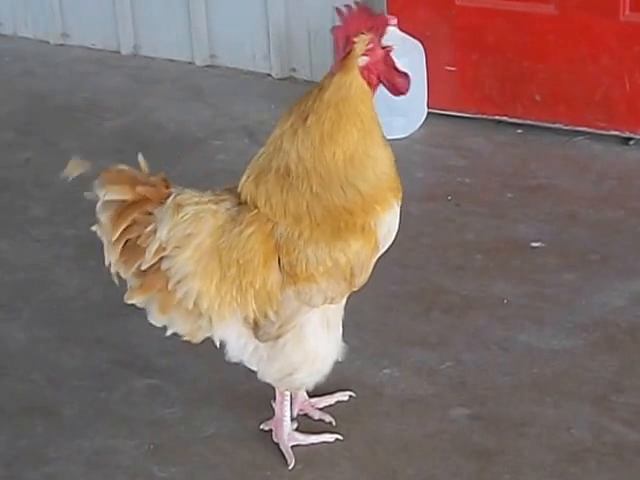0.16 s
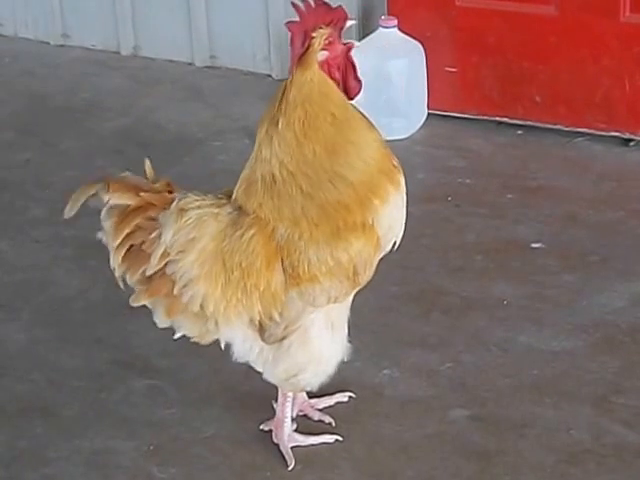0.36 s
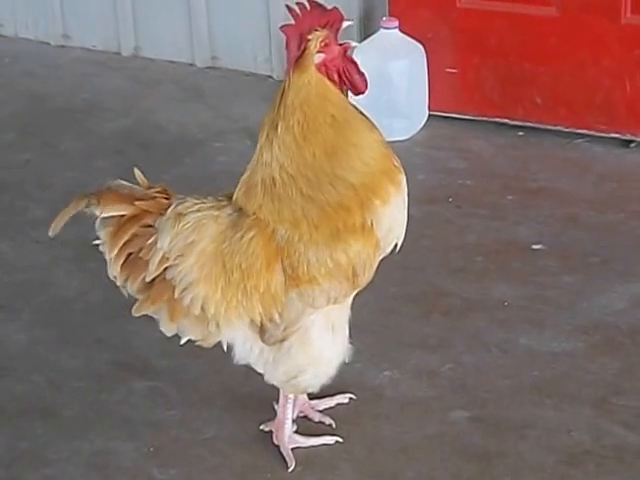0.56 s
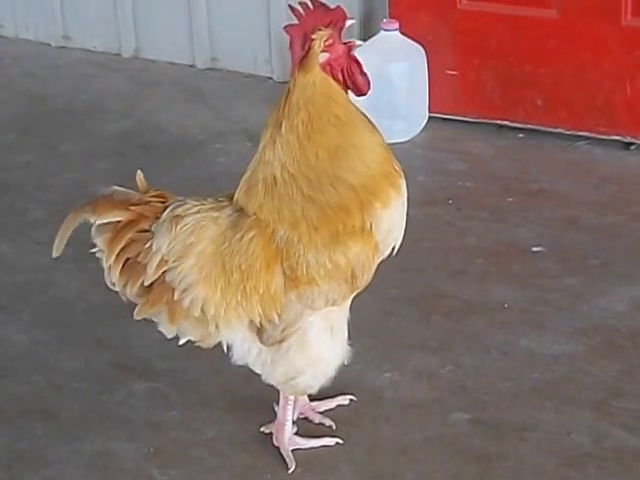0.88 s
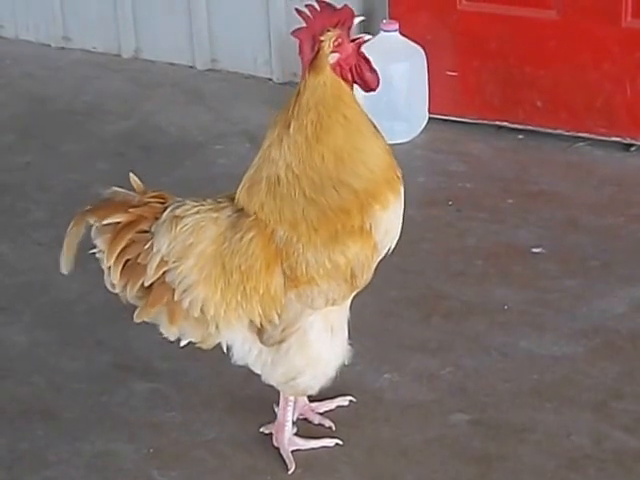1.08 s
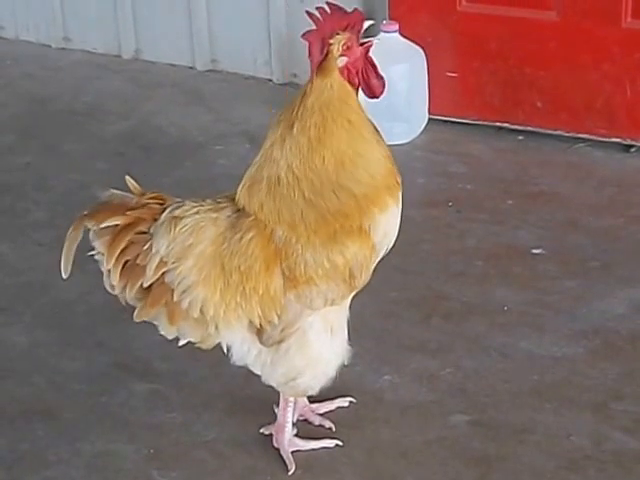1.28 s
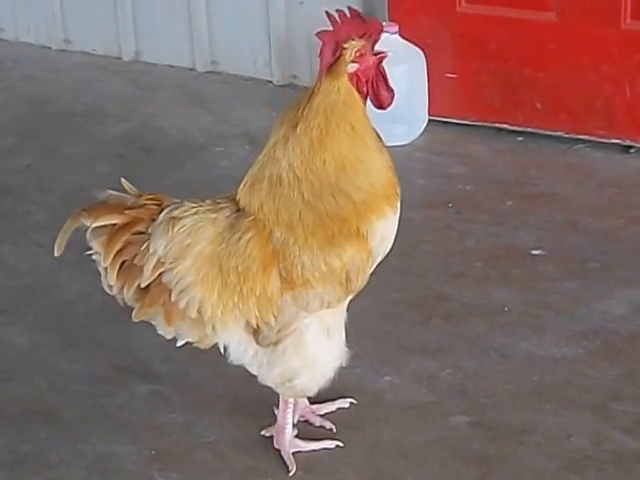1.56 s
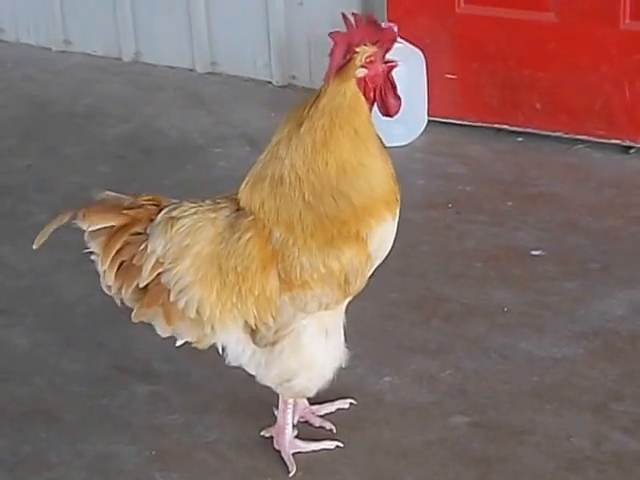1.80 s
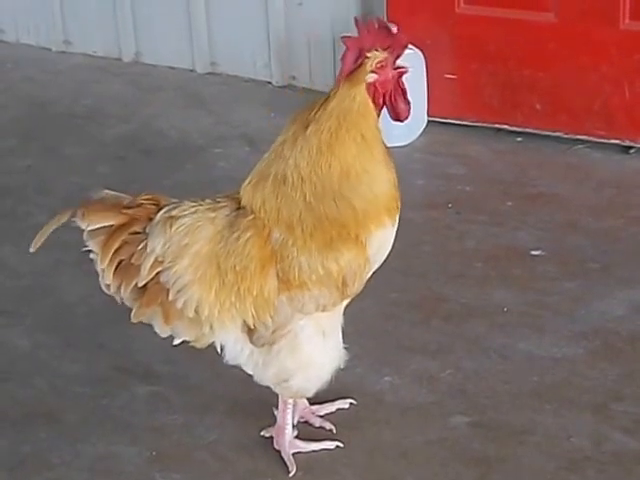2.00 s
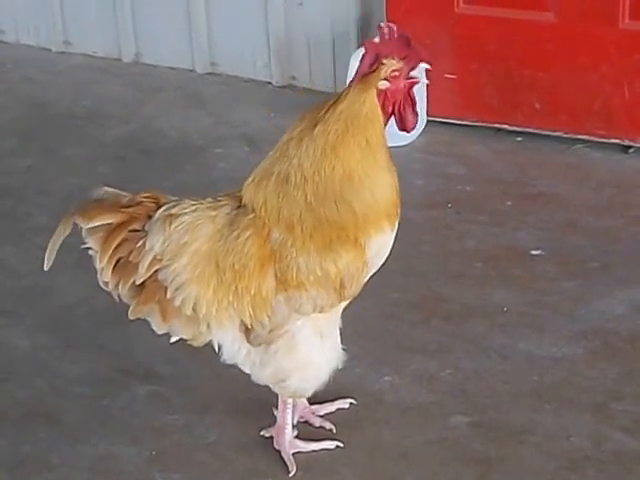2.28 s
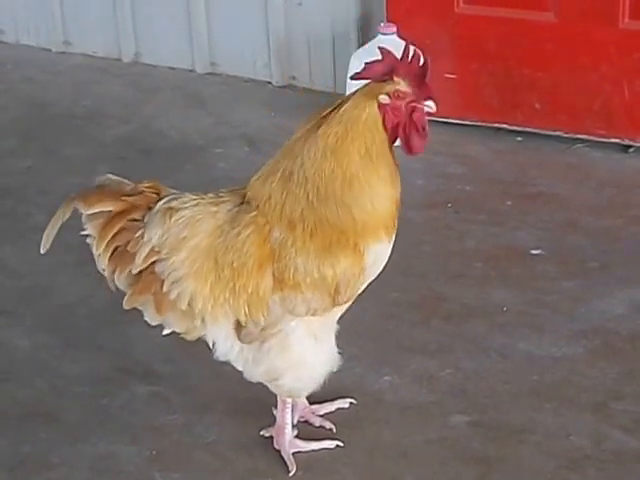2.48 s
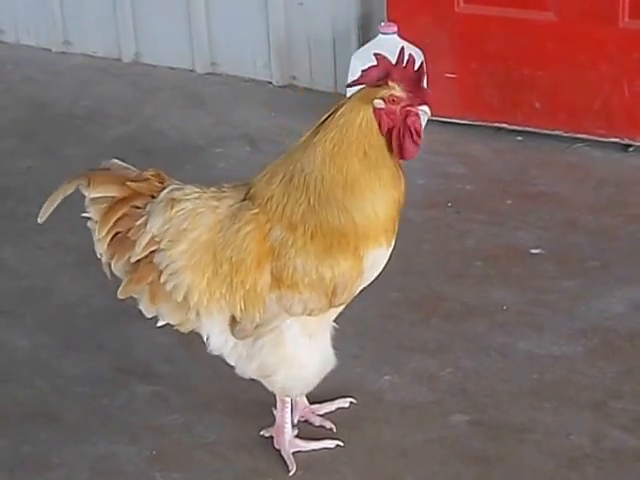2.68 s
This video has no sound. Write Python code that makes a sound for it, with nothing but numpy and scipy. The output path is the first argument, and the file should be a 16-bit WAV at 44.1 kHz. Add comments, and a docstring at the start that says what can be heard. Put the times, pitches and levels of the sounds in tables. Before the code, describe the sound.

A single close rooster crow: a rough bark and short nasal note, two rasping syllables, then a long note cracking into screeches, clearing and sagging to a gulp, with shed echo and faint microphone rumble.

```python
"""Concrete-floored shed: a rooster crows once. A bark and a short note, two rasping syllables,
then a long note that breaks twice into a screech, clears, sags and ends in a gulp.
Rough voice: uneven syrinx slaps through resonances, plus wavering partials; clear voice: sine partials.
The shed adds a decaying noise echo; filtered noise gives air and a rumble on the microphone, with one low bump.
The camera turns its gain down under the crow, lifts the treble and limits peaks."""
import sys
import numpy as np
from scipy import signal
from scipy.fft import rfft, irfft, next_fast_len
from scipy.io import wavfile
from scipy.ndimage import uniform_filter1d, minimum_filter1d, map_coordinates

SR = 44100
rng = np.random.default_rng(int(sys.argv[2]) if len(sys.argv) > 2 else 0)


def store_pcm(level_fs):
    """Save levels as 16-bit WAV."""
    pcm = np.round(np.clip(level_fs, -1, 1) * 32767).astype(np.int16)
    wavfile.write(sys.argv[1], SR, np.atleast_2d(pcm).T)


N = 125685

# Loudness of the third syllable's rasp and pitched core: (t/s, relative level/dB)
THIRD = [(.678, -17.5), (.702, -14.5), (.724, -15.5), (.74, -8.5), (.765, -21.5), (.788, -16.5),
         (.808, -24.5), (.844, -9.5), (.86, -18.5), (.888, -13), (.942, -21.5), (.985, -16.5),
         (1.062, -16.5), (1.086, -17.5), (1.14, -25.5), (1.2, -42.5), (1.27, -41)]
# Loudness of the screech's rasp and pitched core: (t/s, relative level/dB)
SCREECH = [(1.282, -24), (1.305, -12), (1.33, -10.5), (1.345, -17.5), (1.41, -9.5), (1.425, -15),
           (1.495, -13.5), (1.57, -14), (1.67, -12), (1.703, -19), (1.718, -24), (1.79, -34.5), (1.822, -8),
           (1.838, -12.5), (1.858, -9.5), (1.874, -27.5), (1.985, -37.5)]
TOP_HZ = 8080  # upper band limit
FLUTTER = .0008  # pitch tremble of the clear voice, fraction of pitch


def amp(db):
    """Decibels to gain."""
    return 10 ** (np.asarray(db) / 20)


def unit(x):
    """Scale to rms 1."""
    return x / np.sqrt(np.mean(x ** 2) + 1e-20)


def along(points, hz):
    """(f/Hz, value) points interpolated on a log frequency axis."""
    f_hz, values = np.transpose(points)
    return np.interp(np.log(hz + 1), np.log(f_hz + 1), values)


def curve(rows, axis=1):
    """One column of a timed table, per sample."""
    rows = np.asarray(rows)
    return np.interp(np.arange(N) / SR, rows[:, 0], rows[:, axis])


def gate(rows):
    """Open from the first to the last row of a timed table, with linear edges."""
    edge_s = 0.0051
    t = np.arange(N) / SR
    inside_s = np.minimum(t - rows[0][0], rows[-1][0] - t)
    return np.clip(inside_s / edge_s + .5, 0, 1)


def wobble(knots_per_s):
    """Smooth random curve through standard normal knots."""
    knots = rng.standard_normal(4096)
    return map_coordinates(knots, [np.arange(N) * knots_per_s / SR], mode="wrap")


def filtered(x, response):
    """x times a response of frequency, zero-padded against wrap-around."""
    m = next_fast_len(N + SR // 2)
    spectrum = rfft(x, m) * response(np.fft.rfftfreq(m, 1 / SR))
    return irfft(spectrum, m)[..., :N]


def coloured(x, colour):
    """x through causal, ringing resonances of a (f/Hz, level/dB) colour, at rms 1."""
    def response(hz):
        # folded cepstrum: minimum phase
        cepstrum = irfft(np.log(amp(along(colour, hz))))
        half = len(cepstrum) // 2
        cepstrum[1:half] *= 2
        cepstrum[half + 1:] = 0
        return np.exp(rfft(cepstrum)) * (hz < TOP_HZ)
    return unit(filtered(x, response))


def phase_of(pitch_hz, flutter):
    """Phase of the syrinx, whose pitch trembles slightly."""
    trembling_hz = pitch_hz * (1 + flutter * wobble(knots_per_s=110))
    return 2 * np.pi * np.cumsum(trembling_hz) / SR


def harmonics(phase, lines):
    """Sum of (multiple, level/dB) sine partials at rms 1."""
    return unit(sum(amp(db) * np.sin(k * phase) for k, db in lines))


def background():
    """Steady air noise, a lumpy rumble on the microphone and one soft low bump: a sine under a Gaussian."""
    # Air noise spectrum: (f/Hz, relative level/dB)
    air_colour = [(120, -25.5), (400, -10), (800, -10), (1700, -14), (3800, -16.5), (7500, -33)]
    # Rumble spectrum: (f/Hz, relative level/dB)
    rumble_colour = [(20, -1), (75, 5), (120, 2.5), (200, -3), (700, -11), (1300, -41.5)]
    # Rumble loudness: (t/s, level/dB)
    rumble_level = [(0, -33), (.2, -32), (.35, -34), (.6, -24), (.8, -42.5), (1.02, -29), (1.3, -39.5),
                    (2.7, -29.5), (2.8, -17.5), (2.85, -33)]
    air_db = -34
    bump_db, bump_s, bump_hz, bump_width_s = -10, 2.808, 114.6, 0.008
    air = amp(air_db) * coloured(rng.standard_normal(N), air_colour)
    rumble_gain = amp(curve(rumble_level) + 1.3 * wobble(knots_per_s=25))
    rumble = rumble_gain * coloured(rng.standard_normal(N), rumble_colour)
    t = np.arange(N) / SR - bump_s
    bump = -amp(bump_db) * np.exp(-(t / bump_width_s) ** 2) * np.sin(2 * np.pi * bump_hz * t)
    return air + rumble + bump


def rough(loudness, colour, pulse_hz, jitter, gain_db):
    """Syrinx slaps at a wandering nominal rate and uneven times; body and treble vary apart; throat colours."""
    wander, wander_per_s = .035, 45  # log rate, knots/s
    scatter_db, surge_db, surge_per_s = 2.5, 1.8, 240  # per slap; slower swell, knots/s
    split_hz = 3300  # body below, treble above
    chance = rng.standard_normal((4096, 3))  # interval, body level, treble level
    cycles = np.cumsum(pulse_hz * np.exp(wander * wobble(wander_per_s))) / SR
    slap_cycles = np.cumsum(np.exp(jitter * chance[:, 0]))
    at = np.interp(slap_cycles, cycles, np.arange(N))
    keep = at < N - 1
    at = at[keep].astype(int)

    def slap_train(column):
        slaps = np.bincount(at, amp(scatter_db * chance[keep, column]), N)
        return (slaps - slaps.mean()) * amp(surge_db * wobble(surge_per_s))

    body, treble = slap_train(1), slap_train(2)
    pulses = body + filtered(treble - body, lambda hz: hz > split_hz)
    voice = coloured(pulses, [(60, -70)] + list(colour))
    return voice * amp(curve(loudness) + gain_db) * gate(loudness)


def rasps():
    """The rough stretches: trains of slaps, each through its own throat resonances."""
    # Loudness of bark, second syllable and gulp: (t/s, relative level/dB)
    bark = [(.198, -10), (.205, 3.5), (.218, -8), (.234, -21.5), (.25, -23.5), (.3, -31), (.345, -46),
            (.365, -18), (.385, -25.5)]
    second = [(.448, -12), (.457, -10), (.476, 4.5), (.492, -25), (.515, -20), (.538, -6.5), (.56, -25.5),
              (.595, -27.5), (.63, -15), (.652, -11), (.675, -19)]
    gulp = [(2.455, -23), (2.466, -15), (2.478, -19), (2.495, -31)]
    # Throat resonances of each rough stretch: (f/Hz, relative level/dB)
    bark_colour = [(300, -26.5), (470, -20), (570, -3), (670, 0), (780, -10.5), (1000, -7), (1350, 0),
                   (1680, -0.5), (2100, -6), (2600, -24.5), (2980, -3.5), (3550, -40), (4700, -16),
                   (5550, -15), (6200, -24.5), (7300, -33)]
    second_colour = [(300, -38.5), (520, -30.5), (620, -5), (700, 8), (880, -14), (1170, -11), (1650, -4),
                     (1950, -8.5), (2180, -1), (2520, -19.5), (2860, -5), (3450, -38), (3900, -10.5),
                     (4200, -17), (4850, -10), (5500, -22), (7300, -34)]
    third_colour = [(300, -47.5), (490, -45), (610, -6), (700, 7), (900, -16), (1150, -7), (1270, -10),
                    (1480, -3.5), (1650, 1.5), (1920, -2.5), (2170, 0), (2480, -17.5), (2880, -8.5),
                    (3300, -22), (3950, -17), (4300, -15), (4880, -6.5), (5550, -21.5), (7300, -27)]
    screech_colour = [(300, -39), (490, -19), (610, -6.5), (700, -13.5), (860, -12), (1020, -26),
                      (1330, -4), (1450, -5.5), (1690, 3.5), (1900, -6), (2460, -26.5), (2680, -22.5),
                      (3100, -33), (3650, -32), (4400, -28), (4900, -11.5), (5400, -16), (7100, -39.5)]
    gulp_colour = [(300, -25), (480, -17.5), (580, 5), (680, -12), (850, -19.5), (1370, -8), (1550, -7),
                   (2300, -29), (2800, -21.5), (3400, -41), (5400, -32.5), (7300, -48.5)]
    return (rough(bark, bark_colour, pulse_hz=299.6, jitter=.26, gain_db=-5.0)
            + rough(second, second_colour, pulse_hz=601.0, jitter=.18, gain_db=-4.5)
            + rough(THIRD, third_colour, pulse_hz=552, jitter=.17, gain_db=-3.0)
            + rough(SCREECH, screech_colour, pulse_hz=828, jitter=.25, gain_db=-4.5)
            + rough(gulp, gulp_colour, pulse_hz=580, jitter=.12, gain_db=0))


def first_note():
    """A sine scoops up in the bark, then a short, low, nasal note; uneven cycles blur its upper harmonics."""
    # Upward scoop: (t/s, pitch/Hz, relative level/dB)
    scoop_track = [(.198, 555, -16), (.215, 595, -15), (.238, 700, -21)]
    # Short note: (t/s, pitch/Hz, relative level/dB)
    note_track = [(.25, 486, -13.5), (.27, 489, -21.5), (.282, 492.8, -9), (.308, 491.2, -14.5),
                  (.326, 496.4, -25.5), (.347, 506, -14), (.365, 499, -22)]
    # Its harmonics: (multiple of pitch, relative level/dB)
    note_lines = [(1, -18), (2, -15), (3, -3.5), (4, -1), (6, -17.5), (8, -15), (9, -17), (10, -8.5),
                  (11, -17.5), (12, -22.5)]
    scoop = np.sin(phase_of(curve(scoop_track), FLUTTER))
    scoop = scoop * amp(curve(scoop_track, axis=2)) * gate(scoop_track)
    phase = phase_of(curve(note_track), flutter=.005) + .06 * wobble(knots_per_s=300)
    note = harmonics(phase, note_lines) * amp(curve(note_track, axis=2)) * gate(note_track)
    return scoop + note


def split_voice(loudness, lines, flutter, gain_db):
    """The syrinx's two sides pull against each other: partials waver together and swell in turn."""
    swap_db, swap_per_s = 5, 32  # swell of each partial, knots/s
    phase = phase_of(np.ones(N), flutter)  # of 1 Hz
    voice = sum(amp(db + swap_db * wobble(swap_per_s)) * np.sin(hz * phase) for hz, db in lines)
    return unit(voice) * amp(curve(loudness) + gain_db) * gate(loudness)


def hoarse_tones():
    """Pitched cores of the rough stretches: wavering partials of the split syrinx."""
    # The voice catches a pitch in the second syllable: (t/s, level/dB before the crow's gain)
    catch = [(.47, -31), (.51, -19.5), (.54, -14), (.56, -36)]
    # Partials of catch, third syllable and screech: (f/Hz, relative level/dB)
    catch_lines = [(785, -1.5), (1190, -1.5), (1580, -2), (2380, 4.5), (3150, -7), (3885, 7.5)]
    third_lines = [(705, -5), (1055, -8), (1175, -3.5), (1480, -3.5), (1650, 2.5), (2160, 0), (2700, -13.5),
                   (3875, -13.5), (4850, -9.5)]
    screech_lines = [(605, -6.5), (860, -9), (1655, 2.5), (1745, -1), (4970, -16)]
    return (split_voice(catch, catch_lines, flutter=.006, gain_db=0)
            + split_voice(THIRD, third_lines, flutter=.013, gain_db=-3.5)
            + split_voice(SCREECH, screech_lines, flutter=.013, gain_db=-7))


def long_note(low_db=1, octave_db=1):
    """Clear voice: two strong partials, overtones sliding through throat resonances, period doubling at onset."""
    # Pitch: (t/s, f/Hz)
    pitch_track = [(1.08, 726.4), (1.16, 756.4), (1.268, 761.4), (1.295, 814), (1.68, 747), (1.72, 750.6),
                   (1.788, 766), (1.81, 817), (1.865, 754), (2.0, 739.9), (2.2, 725.2), (2.35, 709.8),
                   (2.42, 689.6), (2.46, 668)]
    # Clear stretches: (t/s, fundamental/dB, octave/dB, overtones/dB), relative levels
    clear_a = [(1.08, -44, -35, -39), (1.135, -22.5, -14.5, -33.5), (1.2, -31.5, -14, -26.5),
               (1.256, -21, -8, -33.5), (1.28, -37.5, -13, -38), (1.298, -33.5, -25, -44)]
    clear_b = [(1.685, -32, -17.5, -25.5), (1.705, -24.5, -12.5, -30.5), (1.755, -28, -13.5, -37.5),
               (1.781, -16, -11, -28.5), (1.81, -35.5, -14, -43.5)]
    clear_c = [(1.866, -22.5, -12, -29), (1.94, -18.5, -13, -25.5), (1.964, -15, -10.5, -32),
               (1.992, -26, -11.5, -32.5), (2.002, -21, -20, -41.5), (2.014, -22, -17.5, -33),
               (2.042, -22.5, -12, -34.5), (2.108, -21.5, -4.5, -23), (2.118, -19.5, -12.5, -29.5),
               (2.154, -21, -9, -24.5), (2.186, -22, -29, -23), (2.204, -22, -10.5, -22),
               (2.246, -16, -10.5, -20.5), (2.266, -19, -20.5, -27.5), (2.304, -21, -21, -22.5),
               (2.328, -12.5, -13.5, -22.5), (2.354, -14, -18, -19), (2.372, -14, -15.5, -30),
               (2.382, -17, -18, -18.5), (2.414, -13.5, -7.5, -28), (2.432, -23.5, -11, -32),
               (2.462, -21.5, -24.5, -32)]
    # Throat response for the overtones: (f/Hz, relative level/dB)
    throat = [(2050, -29.5), (2200, -0.5), (2300, -11), (2800, 8), (2930, -0.5), (3040, -19), (3600, -16),
              (4350, -18.5), (4550, -7), (4850, -17), (5150, 5), (5350, -0.5), (5720, 0.5), (5980, -12),
              (7300, -22.5)]
    # Period doubling as the note settles: (t/s, relative level/dB)
    doubling = [(1.095, -27), (1.14, -18), (1.2, -35), (1.27, -56)]
    # Its partials: (multiple of pitch, relative level/dB)
    doubling_lines = [(1.5, -4.5), (2.5, 0.5), (4, -15), (6, -14), (6.5, -7), (7.5, -20.5), (8, -19)]
    waver_db, shimmer_db = 2.2, 1.52
    pitch_hz = curve(pitch_track)
    phase = phase_of(pitch_hz, FLUTTER)
    weights = {k: amp(along(throat, k * pitch_hz) + waver_db * wobble(knots_per_s=22.11))
               for k in range(3, 11)}
    overtones = sum(w * np.sin(k * phase) for k, w in weights.items())
    overtones = overtones / np.sqrt(sum(w ** 2 for w in weights.values()) / 2)
    doubling_gain = amp(curve(doubling) + waver_db * wobble(knots_per_s=70))
    voice = harmonics(phase, doubling_lines) * doubling_gain * gate(doubling)
    for rows in (clear_a, clear_b, clear_c):
        low = amp(curve(rows) + low_db) * np.sin(phase)
        octave = amp(curve(rows, axis=2) + octave_db) * np.sin(2 * phase)
        upper = amp(curve(rows, axis=3)) * overtones
        voice = voice + gate(rows) * (low + octave + upper)
    return voice * amp(shimmer_db * wobble(knots_per_s=90))


def shed(x):
    """The shed's echo: convolution with 1 s of noise, each frequency decaying at its own speed."""
    # Decay time: (f/Hz, t60/s)
    decay = [(300, 2.5), (700, 1.25), (1500, 1.096), (5500, 0.91), (8000, 2.3)]
    predelay_s = .012  # to the first reflection
    hz, t, z = signal.stft(rng.standard_normal(SR), SR, nperseg=256)
    decaying = z * amp(-60 * t / along(decay, hz)[:, None])
    tail = signal.istft(decaying, SR, nperseg=256)[1]
    tail = tail / np.sqrt(np.mean(np.abs(rfft(tail, SR)[500:2500]) ** 2))  # unit gain over 500-2500 Hz
    return signal.fftconvolve(x, np.pad(tail, (int(predelay_s * SR), 0)))[:N]


def scene(crow_db=8):
    """Crow, echo and background; opposite phase slopes make the left channel a little late."""
    # Echo send of the clear voice: (f/Hz, gain/dB)
    clear_wet = [(750, -11), (1400, -8), (2800, -10)]
    hoarse_wet_db, lag_s = -5.5, 0.0000647
    ambience = background()
    hoarse = amp(crow_db) * (rasps() + first_note() + hoarse_tones())
    clear = amp(crow_db) * long_note()
    clear_send = filtered(clear, lambda hz: amp(along(clear_wet, hz)))
    echo = shed(amp(hoarse_wet_db) * hoarse + clear_send)
    sound = hoarse + clear + echo + ambience
    left_right = np.array([[-1], [1]])
    return filtered(sound, lambda hz: np.exp(1j * np.pi * hz * lag_s * left_right))


def record(dry):
    """Camera: gain drops fast under loud sound, recovers slowly; treble lift, peak limiter, steep band limit."""
    # Microphone treble response: (f/Hz, gain/dB)
    treble_lift = [(1000, 1), (3000, .8), (5000, 3.4), (7300, 5), (8000, -12)]
    threshold_db, max_cut_db, recover_db_per_s = -18, 7.5, 31.5
    ceiling = .93  # limiter, ahead of the band limit
    level_db = 10 * np.log10(np.abs(uniform_filter1d(dry[0] ** 2, size=256)) + 1e-12)
    recovery_db = recover_db_per_s * np.arange(N) / SR
    held_db = np.maximum.accumulate(level_db + recovery_db) - recovery_db
    cut_db = uniform_filter1d(np.clip(held_db - threshold_db, 0, max_cut_db), size=256)
    bright = filtered(dry * amp(-cut_db), lambda hz: amp(along(treble_lift, hz)))
    needed = ceiling / np.maximum(np.abs(bright).max(axis=0), ceiling)
    limit = uniform_filter1d(minimum_filter1d(needed, size=181), size=181)
    return filtered(bright * limit, lambda hz: hz < TOP_HZ)


dry = scene()
out = record(dry)
store_pcm(out)
```